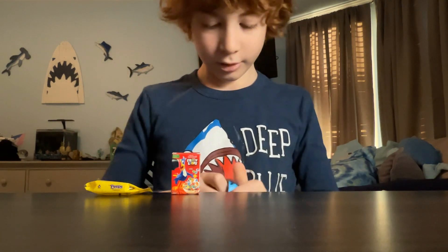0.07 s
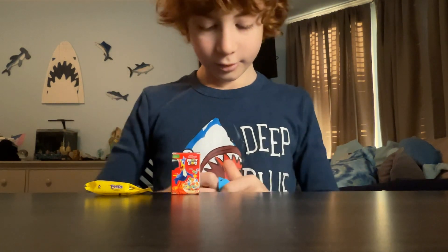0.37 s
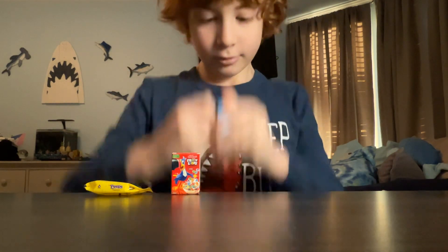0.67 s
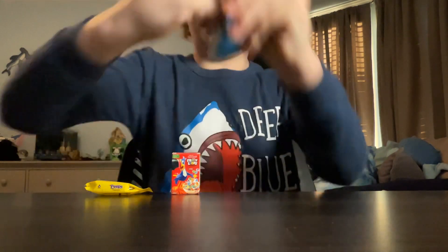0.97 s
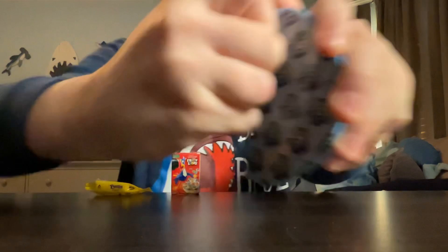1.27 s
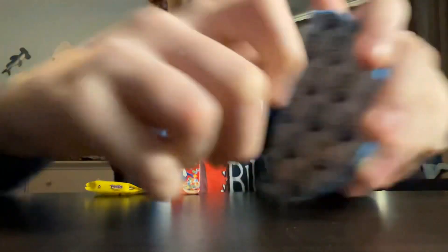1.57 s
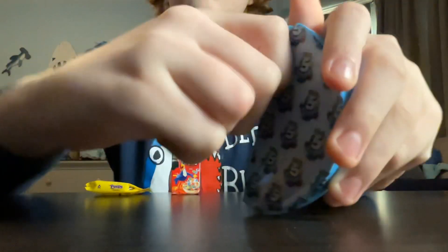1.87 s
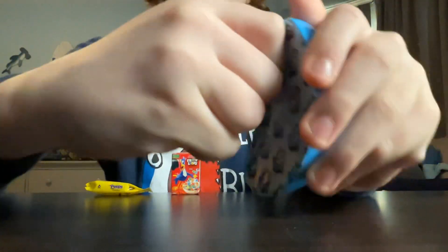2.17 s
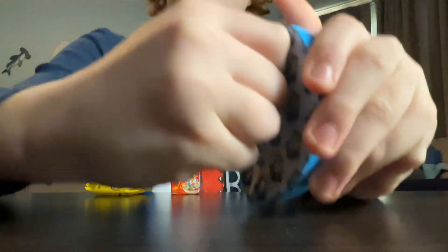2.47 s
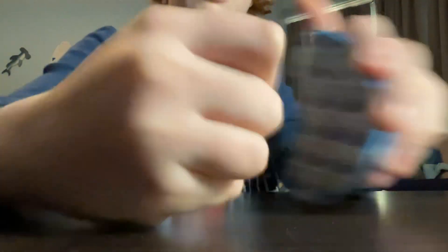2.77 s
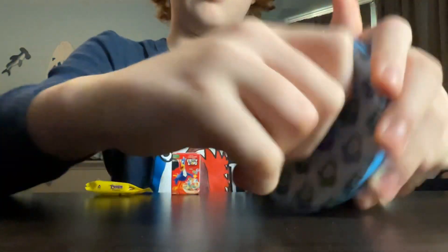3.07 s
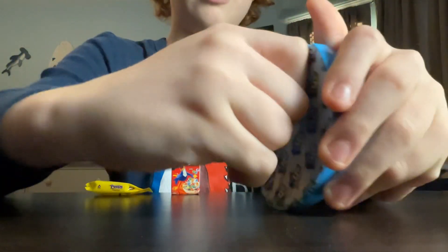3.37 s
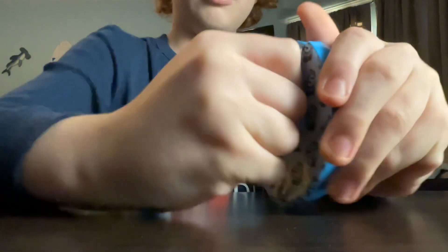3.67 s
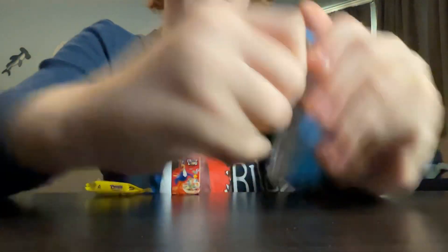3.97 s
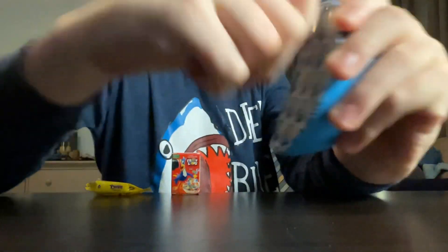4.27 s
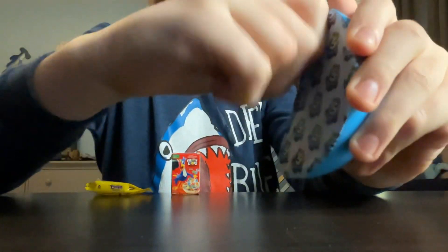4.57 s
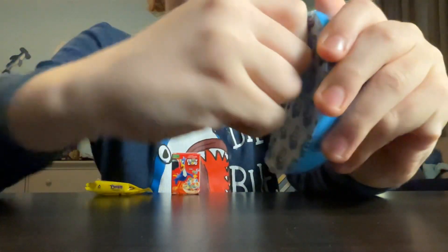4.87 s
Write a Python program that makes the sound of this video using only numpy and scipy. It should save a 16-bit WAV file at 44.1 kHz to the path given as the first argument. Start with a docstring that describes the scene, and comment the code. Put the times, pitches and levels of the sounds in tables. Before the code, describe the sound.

In a small, quiet room, fingers softly rub a hollow plastic toy capsule near the microphone. It knocks on a tabletop a few times and is twisted, its rim snapping and rattling in several short bursts of bright clicks. Faint rubbing fills the pauses. After a short lull, the lid works loose with the loudest crackle of plastic scrapes and clicks, over a low table bump.

```python
"""Faint finger rubs and small clicks on a hard plastic toy capsule, close to the microphone.
It is turned, knocked on a table and twisted open. The rim catches and snaps, ringing the hollow,
wall and thin edges of the shell; knocks and bumps sound the table. At the end the lid gives way
in a dense run of slips. A small furnished room answers."""
import sys
import numpy as np
from scipy import signal
from scipy.fft import rfft, irfft
from scipy.io import wavfile

SR = 44100
rng = np.random.default_rng(int(sys.argv[2]) if len(sys.argv) > 2 else 0)


def unload_audio(sound):
    """Save the sound as a 16-bit wav file, at the path given as the first command line argument."""
    columns = np.transpose(np.atleast_2d(sound))
    # keep every value between -1 and 1, then stretch to whole-number steps
    steps = np.round(np.clip(columns, -1, 1) * 32767)
    wavfile.write(sys.argv[1], SR, steps.astype(np.int16))


N = 225977
T = np.arange(4096) / SR  # time axis of one contact

# room noise spectrum: f/Hz, relative density/dB
AIR_SPECTRUM = [(30, -16.5), (70, 6.5), (150, -1.5), (600, -5.5), (950, -15), (1450, -8.5), (1950, -20.5),
                (4000, -22), (16000, -26.5)]
# reflections from table, hands and chest: delay/s, level/dB
REFLECTIONS = [(.0029, -18.5), (0.0128, -21.5)]
# diffuse room tail: f/Hz, level/dB, T60/s
ROOM_TAIL = [(300, -22, 0.6), (960, -6, 0.071), (1630, -14, 0.19), (3200, -16.5, 0.12), (8000, -22, 0.16),
             (15000, -23.5, 0.25)]
# modes of the table top under the capsule: f/Hz, width/Hz, level/dB
TABLE_MODES = [(162, 160, -5), (194, 57, -1), (306, 28, -0.5), (458, 72, -1), (587, 140, -6),
               (780, 51, -8.5)]
# modes of the shell: f/Hz, width/Hz, level/dB
SHELL_MODES = [(1470, 190, 5), (1559, 97, 6.5), (2057, 53, -4), (2217, 92, 1.5), (2554, 280, -4),
               (3090, 59, -4.5), (3617, 230, -3), (3780, 96, -14), (5330, 310, -7.5), (6500, 770, -8),
               (8564, 980, -3.5), (13200, 7000, -6.5)]
# bands of hollow, wall and edge: low/Hz, high/Hz
SHELL_BANDS = [(1150, 2500), (2500, 7000), (7000, 17000)]
# hands and forearms jog the table: t/s, level/dB, length/s
TABLE_BUMPS = [(1.33, -48, 0.04), (2.681, -48.5, 0.07), (3.989, -48.5, 0.055), (4.445, -57.5, 0.043),
               (4.892, -33.5, 0.048)]
# fingers and lid slide on the shell: start/s, end/s, strength/dB, hardness/dB
RUB_STROKES = [(0, 0.175, -68, -11), (0.122, 0.427, -80.5, -17), (0.502, 0.544, -67.5, -12.5),
               (0.635, 0.71, -72, -8.5), (0.802, 0.958, -74, -15), (0.99, 1.144, -70, -13),
               (1.141, 1.161, -59, -12.5), (1.151, 1.328, -79, -11.5), (1.576, 1.601, -61.5, -16),
               (1.675, 1.838, -58.5, 0.5), (1.784, 1.801, -49, 1.5), (1.912, 2.268, -59, -2),
               (2.574, 2.693, -60.5, 0), (2.669, 2.689, -29.5, -1.5), (2.719, 2.956, -64, -12),
               (2.936, 3.07, -61, -9), (3.111, 3.128, -43, -1.5), (3.399, 3.758, -76, -7.5),
               (3.764, 3.935, -65, -5), (4.384, 4.519, -63, -2.5), (4.898, 4.954, -20.5, 0),
               (4.979, 4.992, -21.5, 2.5), (5.038, 5.146, -45, -1)]
# capsule meets table or palm: t/s, thud level/dB, thud low edge/Hz, hollow re thud/dB
CAPSULE_KNOCKS = [(0.424, -52.5, 400, -22), (0.925, -38.5, 420, -10), (1.3268, -19, 350, 8),
                  (1.6417, -13.5, 280.6, 3.5), (1.9705, -26.5, 170, -5.5), (2.5629, -22.5, 150, -4.5),
                  (3.046, -16, 250, 2), (3.275, -27, 190, -1.5), (3.7365, -28.5, 140, -12)]
# rim snaps: t/s, strength/dB, hardness/dB, first rebound re snap/dB
RIM_SNAPS = [(0.165, -53.5, 7, -11), (0.288, -61, 13.5, -19), (0.6801, -67, 22.5, -15),
             (0.8608, -52, -7.5, -33), (0.9761, -46, -12.5, -17), (0.9931, -44.5, -10.5, -17),
             (1.1789, -57, 0.5, -14.5), (1.3326, -19.5, -1, -22.5), (1.355, -30.5, 0.5, -0.5),
             (1.4011, -36, -13, -18), (1.4082, -20, -4.5, -21), (1.4176, -22, -5.5, -21.5),
             (1.802, -40.5, -2.5, -18.5), (1.9782, -29.5, -6.5, -9), (2.2095, -38, 9.5, -11.5),
             (2.2321, -34, 1, -24), (2.533, -45.5, -2, -14), (2.6814, -18.5, 0, -23.5),
             (2.7395, -22.5, -0.5, -23), (2.7665, -19, 0.5, -22.5), (2.8246, -41, -10, -16),
             (2.8523, -22.5, 1, -22.5), (2.8762, -36.5, -10, -1.5), (2.8971, -19.5, 0.5, -6),
             (3.1307, -22.5, -2.5, -23), (3.8418, -43, -0.5, -25), (3.9032, -51, -8.5, -13),
             (3.943, -18.5, 3, -12.5), (3.961, -22.5, -9.5, -15.5), (3.9686, -20, 3.5, -17.5),
             (3.9978, -23.5, 0, -19), (4.059, -25.5, -3, -2.5), (4.0768, -21.5, -2, -15),
             (4.1809, -21, 3.5, -11.5), (4.2326, -24, 0.5, -17), (4.257, -31, -1, -13),
             (4.7663, -62, -11.5, -23), (4.8856, -23.5, 1, -4.5), (4.8917, -20, -1.5, -7),
             (4.9505, -15.5, 2, -21), (4.9591, -22, 0, -4), (5.0059, -20.5, 3, -8),
             (5.0414, -29.5, -2, -39), (5.1032, -33.5, 0, -1.5)]

HOLLOW_HZ, WALL_HZ, EDGE_HZ = SHELL_BANDS
FLEX_FROM_DB = -41  # stronger contacts also flex the wall
LEAD_IN_S = 0.014  # swell ahead of a snap


def amp(db):
    """dB to gain."""
    return 10 ** (np.asarray(db) / 20)


def unit_rms(x):
    """Scale to rms 1."""
    return x / np.sqrt(np.mean(x ** 2) + 1e-20)


def log_interp(hz, points_hz, values):
    """Interpolate over log frequency."""
    return np.interp(np.log(hz + 1), np.log(points_hz), values)


def add(mix, t_s, sound):
    """Mix in at t_s."""
    part = mix[max(round(t_s * SR), 0):][:len(sound)]
    part += sound[:len(part)]


def band(x, edges_hz, order=2):
    """Causal band-pass."""
    return signal.sosfilt(signal.butter(order, edges_hz, "band", fs=SR, output="sos"), x)


def ring(modes, direct, grip):
    """Impulse response of a body; the grip shifts, damps and weights each mode anew."""
    hz, width_hz, db = np.transpose(modes)[:, :, None]
    shift, damp, weight, side = rng.standard_normal((4, len(modes), 1))
    decay_per_s = np.pi * width_hz * np.exp(.2 * damp)
    gain = np.sign(side) * amp(db + 2 * weight) * 2 * decay_per_s / SR
    waves = gain * np.exp(-decay_per_s * T) * np.cos(2 * np.pi * hz * (1 + grip * shift) * T)
    return waves.sum(0) + direct * (T == 0)


def strike(body, edges_hz, db, decay_s, grit, order=2):
    """A sharp push and dying chatter ring one band of a body; db is its energy spread over 5 ms."""
    chatter = rng.standard_normal(len(T)) * np.exp(-T / decay_s)
    force = (T == 0) + grit * chatter / np.linalg.norm(chatter)
    sound = band(signal.fftconvolve(force, body)[:len(T)], edges_hz, order)
    return amp(db) * sound / np.linalg.norm(sound) * np.sqrt(.005 * SR)


def slips(n, per_s, spread_db, smooth):
    """Tiny uneven impulses over steady noise."""
    size = amp(spread_db * np.minimum(rng.exponential(1, n), 3)) * rng.choice([-1, 1], n)
    catches = rng.random(n) < per_s / SR
    return size * catches + smooth * rng.standard_normal(n)


def shell_levels_db(db, hardness_db):
    """Soft contacts favour the hollow, strong ones the wall, hard ones the edge."""
    flex_db = .22 * max(db - FLEX_FROM_DB, 0)
    return db - .27 - hardness_db, db - .57 + flex_db, db - 1.3 + hardness_db


def air(level_db=-69):
    """Steady faint room noise."""
    hz = np.fft.rfftfreq(N, 1 / SR)
    shape = amp(log_interp(hz, *np.transpose(AIR_SPECTRUM)))
    return amp(level_db) * unit_rms(irfft(rfft(rng.standard_normal(N)) * shape, N))


def room(x):
    """Dull near reflections, then a diffuse tail dying band by band."""
    points_hz, level_db, t60_s = np.transpose(ROOM_TAIL)
    hz, t_s, noise = signal.stft(rng.standard_normal(SR // 2), SR, nperseg=256)
    decay_per_s = np.log(1000) / log_interp(hz, points_hz, t60_s)[:, None]
    gain = amp(log_interp(hz, points_hz, level_db))[:, None] * np.sqrt(2 * decay_per_s / SR)
    tail = signal.istft(noise * gain * np.exp(-decay_per_s * t_s), SR, nperseg=256)[1]
    response = np.zeros(SR)
    for delay_s, db in REFLECTIONS:
        add(response, delay_s, [amp(db)])
    response = signal.sosfilt(signal.butter(1, 4500, fs=SR, output="sos"), response)
    add(response, .005, tail)
    return signal.fftconvolve(x, response)[:N]


def bumps():
    """Dull jolts travel through the table to the microphone."""
    out = np.zeros(N)
    for t_s, db, length_s in TABLE_BUMPS:
        n = round(length_s * SR)
        jolt = band(rng.standard_normal(n + len(T)), (55, 140))[-n:]
        add(out, t_s, amp(db) * unit_rms(jolt * signal.windows.tukey(n, .6)))
    return out


def ticks(per_s=4, strength_db=-68.5, spread_db=4):
    """Faint random catches as the grip shifts."""
    out = np.zeros(N)
    for when, size in rng.random((round(per_s * N / SR), 2)):
        add(out, when * N / SR, snap(strength_db + spread_db * (2 * size - 1), hardness_db=-8.5))
    return out


def pressure(n, lumps_db=5, lumps_per_s=90):
    """A stroke sets in fast, wavers as the fingers creep, lets go gently."""
    along = np.linspace(0, 1, n)
    lumps = rng.standard_normal(int(n / SR * lumps_per_s) + 2)
    waver = amp(lumps_db * np.interp(along, np.linspace(0, 1, len(lumps)), lumps))
    return waver * np.interp(along, [0, .12, .75, 1], [0, 1, 1, 0])


def rubs(spots=4):
    """Several spots stick and slip under one pressure, each with its own shell ring."""
    out = np.zeros(N)
    for start_s, end_s, strength_db, hardness_db in RUB_STROKES:
        n = round(abs(end_s - start_s) * SR) + 2
        load = pressure(n)
        sound = 0
        for _ in range(spots):
            force = slips(n, per_s=260, spread_db=5.5, smooth=.3) * load
            sound += signal.fftconvolve(force, ring(SHELL_MODES, direct=.3, grip=.02))
        # a soft fingertip leaves mainly the hollow's lowest ring
        softness = np.clip(-hardness_db / 13, 0, 1)
        bands_hz = [(1150, 2800 - 800 * softness), WALL_HZ, EDGE_HZ]
        levels_db = shell_levels_db(strength_db, hardness_db)
        for edges_hz, db in zip(bands_hz, levels_db):
            part = band(sound, edges_hz, order=3)
            add(out, start_s, amp(db) * part / np.linalg.norm(part) * np.sqrt(n))
        skin = band(rng.standard_normal(n), (650, 1300)) * load
        skin_db = levels_db[0] - 10 + 8.9 * softness
        add(out, start_s, amp(skin_db) * unit_rms(skin))
    return out


def knocks(bounce_s=.0133):
    """A blunt blow rings the shell, the heavier table top follows, the capsule bounces once."""
    out = np.zeros(N)
    for t_s, thud_db, low_hz, ring_db in CAPSULE_KNOCKS:
        hollow_db = thud_db + ring_db
        wall_db = hollow_db - 13.5
        shell = ring(SHELL_MODES, direct=.55, grip=.03)
        table = ring(TABLE_MODES, direct=.088, grip=.012)
        add(out, t_s + .002, strike(table, (low_hz, low_hz + 720), thud_db, decay_s=.00086, grit=.057))
        add(out, t_s + .0005, strike(shell, (900, 2400), hollow_db, decay_s=.0025, grit=1.8))
        add(out, t_s, strike(shell, WALL_HZ, wall_db, decay_s=.0051, grit=7.2))
        add(out, t_s, strike(shell, (6000, 12000), wall_db - 7, decay_s=.003, grit=3.4))
        add(out, t_s + bounce_s, snap(hollow_db - 22, hardness_db=-2.5))
    return out


def lead_in(db):
    """A brief, faint midrange swell leads into each snap."""
    n = round(LEAD_IN_S * SR)
    rising_noise = slips(n, per_s=660, spread_db=2.5, smooth=.48) * np.linspace(0, 1, n)
    shell = ring(SHELL_MODES, direct=.23, grip=.018)
    swell = band(signal.fftconvolve(rising_noise, shell), (1900, 3900))
    return amp(db) * swell / np.linalg.norm(swell) * np.sqrt(n)


def snap(db, hardness_db):
    """The edge cracks first; wall, lid and hollow ring on; the table answers faintly."""
    out = np.zeros(len(T))
    hollow_db, wall_db, edge_db = shell_levels_db(db, hardness_db)
    lid_db = wall_db - 5.5 - .4 * max(FLEX_FROM_DB - db, 0)  # weak snaps barely pop the lid
    # a catch on the thin edge alone is shorter, so reaches higher
    top_hz = np.clip(11500 * amp(.5 * (edge_db - wall_db)), 9000, 17000)
    shell = ring(SHELL_MODES, direct=.13, grip=.021)
    add(out, .0005, strike(shell, HOLLOW_HZ, hollow_db, decay_s=.0054, grit=1.1, order=3))
    add(out, .0003, strike(shell, WALL_HZ, wall_db, decay_s=.0013, grit=5.7))
    add(out, .0001, strike(shell, (7000, top_hz), edge_db, decay_s=.00087, grit=3, order=1))
    add(out, .0005, strike(shell, (2300, 3700), lid_db, decay_s=.0016, grit=2))
    table = ring(TABLE_MODES, direct=.25, grip=.023)
    add(out, 0, strike(table, (450, 850), hollow_db - 18, decay_s=.0082, grit=1.2))
    add(out, 0, strike(table, (80, 200), db - 28, decay_s=.0047, grit=.8))  # jolt via the fingers
    return out


def rim_snaps(rebounds=2, gap_s=.014, gap_ratio=.74, loss_db=11.5, softer_db=4.5):
    """The rim snaps and rattles into its seat, each rebound sooner, weaker and softer."""
    out = np.zeros(N)
    for t_s, db, hardness_db, rebound_db in RIM_SNAPS:
        add(out, t_s - LEAD_IN_S, lead_in(db - 17.5))
        add(out, t_s, snap(db, hardness_db))
        for k in range(rebounds):
            t_s += gap_s * gap_ratio ** k
            add(out, t_s, snap(db + rebound_db - k * loss_db, hardness_db - (k + 1) * softer_db))
    return out


def scene():
    """Capsule and table in the room, mono."""
    floor = air()
    handling = rim_snaps() + knocks() + bumps() + rubs() + ticks()
    return (handling + room(handling) + floor)[None]


def record(dry, low_hz=48, high_hz=16500, ceiling=.92):
    """Small microphone: bass cut, rounded peaks, band limit."""
    thin = signal.sosfilt(signal.butter(3, low_hz, "high", fs=SR, output="sos"), dry)
    rounded = thin / (1 + (thin / ceiling) ** 6) ** (1 / 6)
    lowpass = signal.firwin(255, high_hz, window=("kaiser", 9), fs=SR)
    return signal.oaconvolve(rounded, lowpass[None], "same")


dry = scene()
out = record(dry)
unload_audio(out)
```